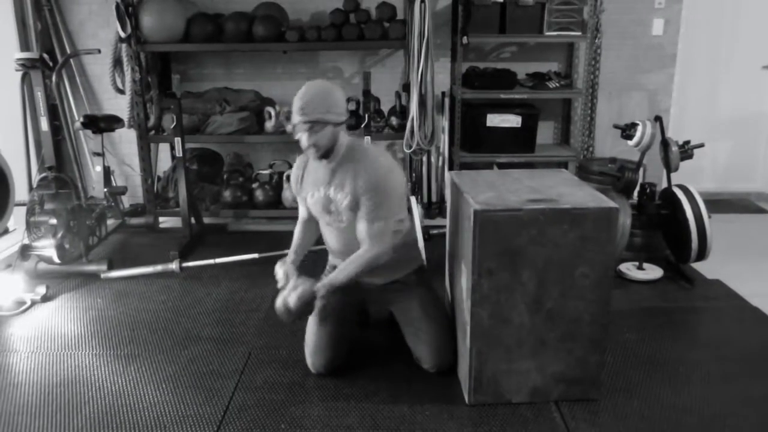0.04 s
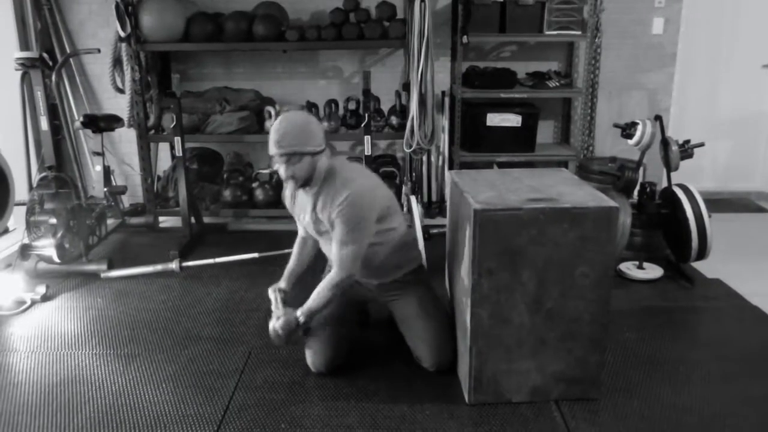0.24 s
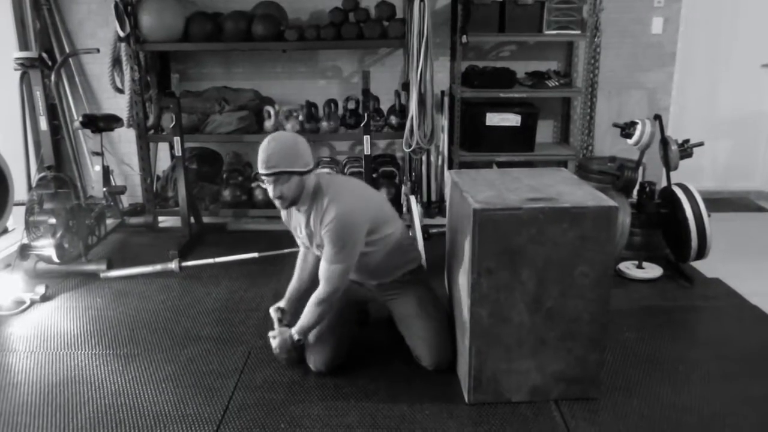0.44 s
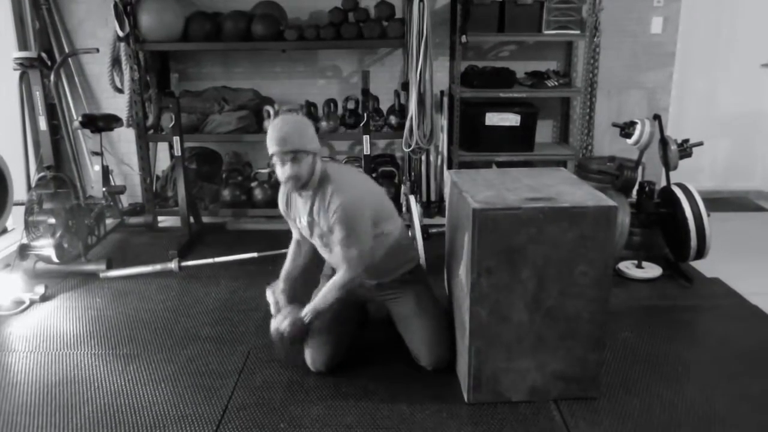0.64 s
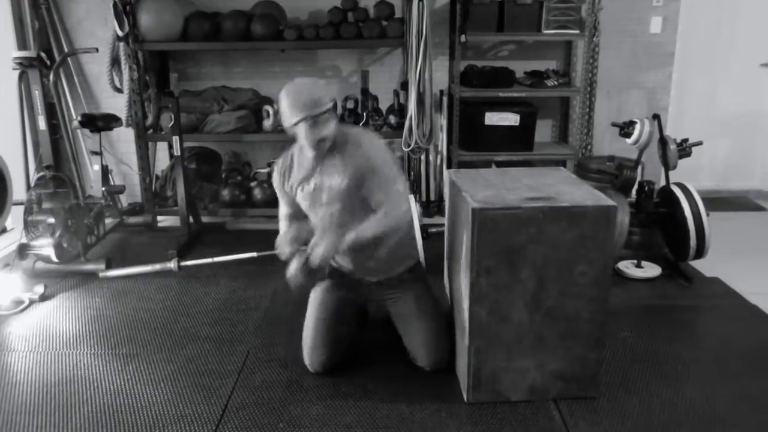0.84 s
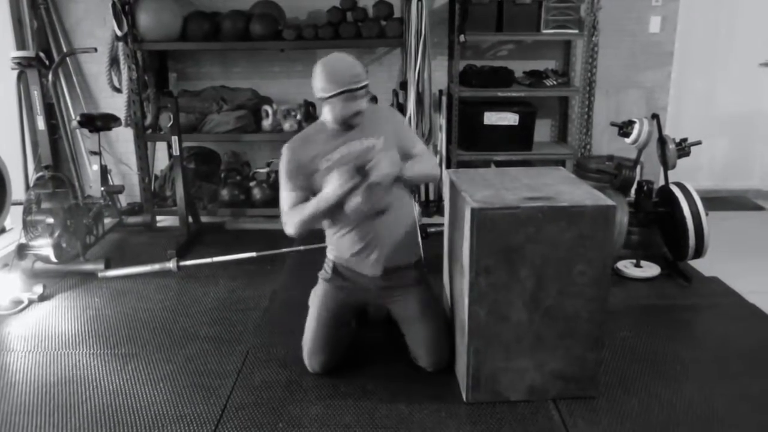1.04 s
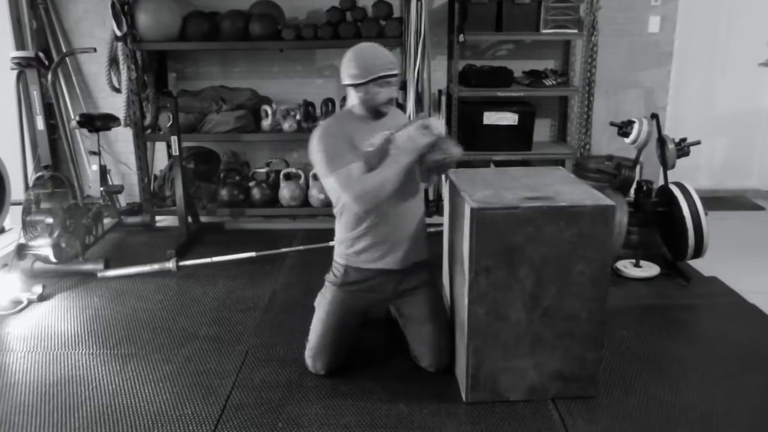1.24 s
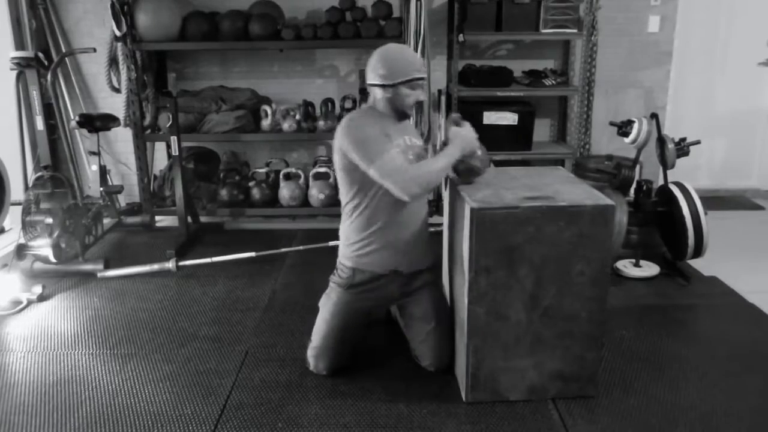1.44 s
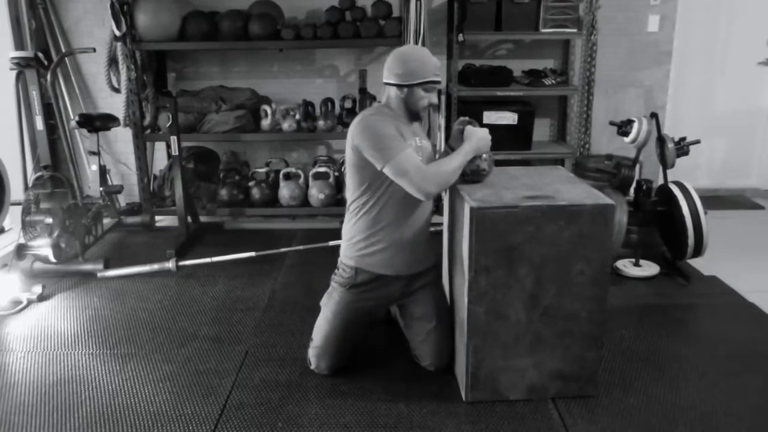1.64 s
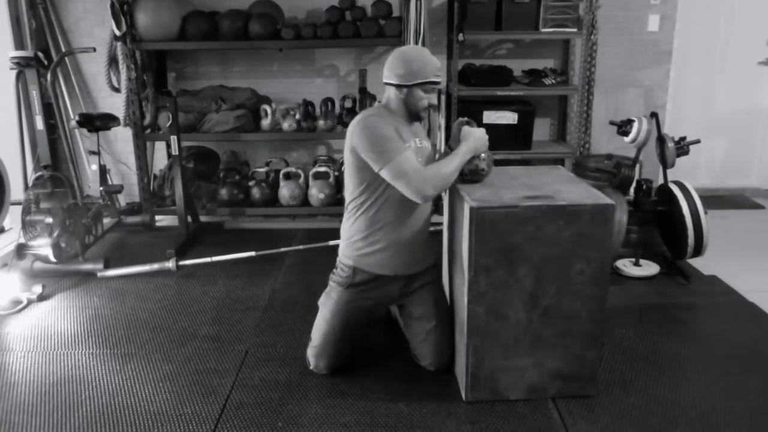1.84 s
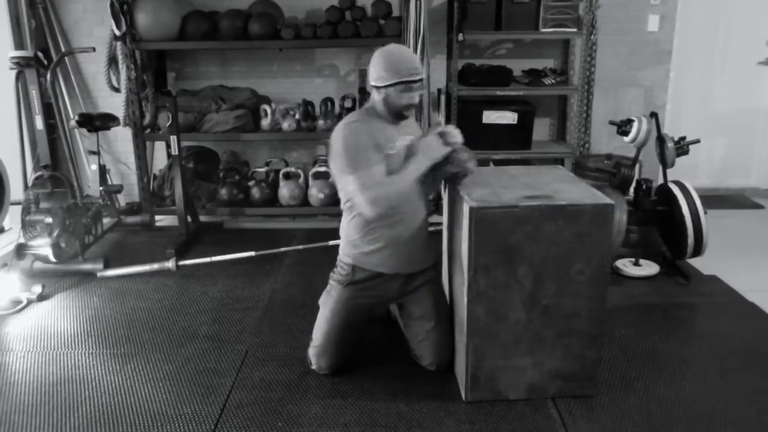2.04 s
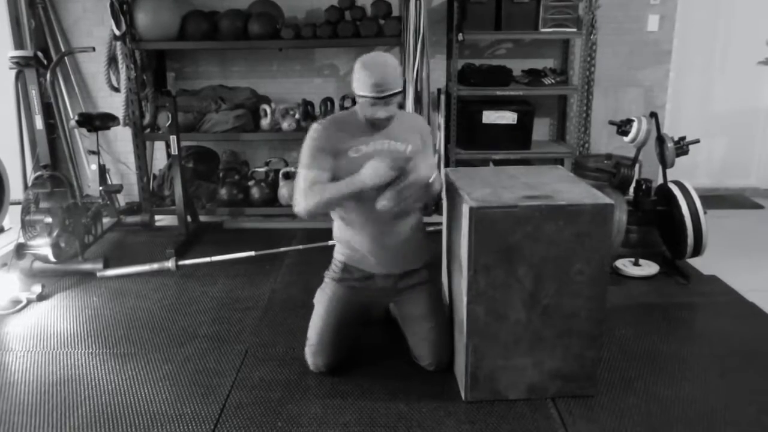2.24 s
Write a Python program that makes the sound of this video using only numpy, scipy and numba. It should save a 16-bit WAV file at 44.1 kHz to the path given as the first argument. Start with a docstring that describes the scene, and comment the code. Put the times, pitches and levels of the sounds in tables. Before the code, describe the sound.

Hollow plywood box booms as an iron weight lands, then the weight drags off its lid

```python
"""In a garage gym, a kneeling lifter handles an iron weight while sleeves and trousers brush.
The weight knocks on the rubber mat, is set on a hollow plywood box, which booms, and is dragged off again.
Knocks and booms are short pushes into ringing tones; cracks, cloth and air are shaped noise.
A room adds its echo, and a gain control turns everything down under the loud blows."""
import sys
import numpy as np
from scipy import signal
from scipy.fft import rfft, irfft
from scipy.io import wavfile
from scipy.ndimage import uniform_filter1d
from numba import njit

SR = 44100
rng = np.random.default_rng(int(sys.argv[2]) if len(sys.argv) > 2 else 0)


def master(y):
    """Save y as 16-bit WAV."""
    cut = np.clip(np.atleast_2d(y).T, -1, 1)
    pcm = np.round(cut * 32767)  # scale
    wavfile.write(sys.argv[1], SR, pcm.astype(np.int16))


N = 101297
T = np.arange(N) / SR  # time of every sample, in seconds

# A "ring time" or "decay time" is the time to fade by 60 dB.

# Air noise: (frequency [Hz], level per Hz [dB])
AIR_COLOUR = [(18, -55), (30, -38), (48, -8.5), (143, -6.5), (172, 3), (201, -7), (255, 0.5), (357, -3),
              (386, -3.5), (618, -5.5), (867, -5.5), (3640, -16), (7960, -28), (10100, -27.5), (15300, -39)]
# Air over time: (time [s], level [dB], treble tilt [dB per octave])
AIR_OVER_TIME = [(0, -39, 0.2), (.3, -37.5, -0.4), (.6, -39.5, 0.84), (.83, -40, -.2), (.875, -37, 0.1),
                 (.95, -38, -.5), (1.02, -37.5, 0.35), (1.12, -38, 0.2), (1.5, -38.5, -0.26),
                 (1.7, -36, -1.93), (2.0, -39.5, -0.56), (2.29, -36, -0.4)]
# Stereo width of the air: (frequency [Hz], side level against middle [dB])
AIR_WIDTH = [(60, 0.5), (110, -25), (200, -17.5), (380, -16.5), (690, -9.5), (1280, -4), (2360, -7.5),
             (4360, -6), (8040, -4), (14800, -2)]
AIR_LEFT_DB = 1.8  # lean to the left in the treble, less and less below 1000 Hz
AIR_SWELL_DB, AIR_FLICKER_DB = 0.5, 0.6

# Echo of the room: (frequency [Hz], decay time [s])
ROOM_DECAY = [(80, 0.84), (250, 0.61), (700, 0.61), (1500, 0.29), (4000, 0.25), (12000, 0.04)]
# Stereo width of the echo: (frequency [Hz], side level [dB])
ROOM_WIDTH = [(60, -33), (200, -99), (400, -48), (800, -13.5), (1500, -8.5), (12000, 0.5)]
ROOM_DELAY_S = 0.008
# how much of each source is sent to the echo
BOX_WET_DB, CRACK_WET_DB, MAT_WET_DB, CLOTH_WET_DB = -20, -3.5, -10.5, -4

# Cloth brushes, one list each: (time [s], level [dB], treble tilt [dB per octave])
CLOTH_BRUSHES = [
    [(.3, -68, -5.5), (.35, -59, 9), (.44, -46, 6), (.49, -41, -1), (.52, -47, 7.5), (.57, -57, 3)],
    [(.61, -55, 4), (.655, -41.5, 5), (.70, -37, 0.2), (.74, -33.5, 0.5), (.765, -39.5, 3), (.80, -47, 4.5),
     (.86, -51.5, -9)],
]
# Cloth noise: (frequency [Hz], level per Hz [dB])
CLOTH_NOISE = [(710, -35), (1200, -2), (1450, 2.5), (1810, 0), (2850, 1.5), (4000, 2), (4400, -2),
               (10000, -8), (15000, -16)]
CLOTH_FLICKER_DB = 0.8

# The touch on the mat and its echoes off the near walls: (time [s], level [dB])
MAT_TOUCHES = [(.5030, -6), (.5115, -11), (.5293, -13.5), (.5375, -12), (.55, -11.5)]
# Tones of mat and floor under the weight: (frequency [Hz], level [dB], ring time [s], push direction [+1 or -1])
MAT_TONES = [(74.5, -35, 0.22, -1), (376, -17.5, 0.13, -1), (626, -24, 0.05, 1), (696, -6, 0.053, 1),
             (770, -5, .025, 1), (880, -14, 0.018, -1)]
# Dense rattle of mat and floor: (frequency [Hz], level per Hz [dB])
MAT_RATTLE = [(50, -16), (80, -11), (170, -13.5), (280, -4), (420, -1), (750, -2), (1000, -8), (1250, -25),
              (3000, -47)]
# How that rattle fades: (frequency [Hz], decay time [s])
MAT_RATTLE_DECAY = [(80, .3), (300, .4), (550, 0.25), (750, .22), (1000, .2)]
TOUCH_PUSH_MS, MAT_RATTLE_DB = 0.99, -19

# Drag off the lid, levels over time: (time [s], thump level [dB], scrape level [dB])
DRAG_LEVELS = [(2.0845, -42, -63), (2.0865, -23.5, -30.5), (2.105, -19.5, -31), (2.125, -21.5, -31),
               (2.14, -17.5, -35), (2.165, -17.5, -37), (2.18, -28, -43), (2.21, -33, -46),
               (2.28, -44, -52)]
# Scraping noise: (frequency [Hz], level per Hz [dB])
SCRAPE_NOISE = [(350, -17), (600, -6.5), (668, 5), (754, -7), (1240, -14), (1330, -10.5), (3140, -14),
                (15000, -44)]
JERKS_PER_S, JERK_JITTER, JERK_SCATTER_DB, JERK_PUSH_MS = 108, 0.1473, 6, 2.85
LOADED_RING_FACTOR = 0.046  # the loaded lid rings for this share of its free ring time

# Iron meets the lid, edge first, then full weight:
# (time [s], push level [dB], push length [ms], crack level [dB], clack level [dB])
LID_BLOWS = [(1.5393, -5.5, 1.33, -14.5, -8), (1.5440, 8, 1.5, -15.5, -0.5)]
# Short clack of the iron: (frequency [Hz], level [dB], ring time [s], push direction [+1 or -1])
IRON_TONES = [(1250, -12, .03, 1), (1750, -12, .022, -1), (3400, -24, .02, 1), (4450, -27, .015, -1)]
# Countless small panel tones heard as a dull crack: (frequency [Hz], level per Hz [dB])
CRACK_NOISE = [(300, -1), (500, 4.5), (900, -3), (1600, -9.5), (2200, -15), (3500, -28.5), (6000, -32.5),
               (12000, -64)]
# How the crack fades: (frequency [Hz], decay time [s])
CRACK_DECAY = [(400, 0.33), (900, 0.28), (1600, 0.064), (3500, 0.05), (12000, 0.022)]
IRON_PUSH_MS = 0.22
RATTLE_RISE_S = 0.0011  # for both the crack and the mat rattle

# Big tones of the plywood box: (frequency [Hz], level [dB], ring time [s], push direction [+1 or -1])
# Close pairs pushed in opposite directions beat against each other.
BOX_TONES = [(119.7, -23, 0.4, 1), (135, -17.5, 0.83, -1), (161.83, -10.5, 0.67, 1),
             (168.6, -14.5, 0.82, -1), (189.6, -18.5, 0.63, 1), (248.4, -20.5, 0.57, -1),
             (251, -20, 1.2, -1), (262.7, -8.5, 0.95, 1), (269, -22, 1.5, -1), (273.4, -3.5, 0.082, -1),
             (289.6, -15.5, 1.1, -1), (314.8, -5, 0.31, 1), (349.6, -11, 0.39, 1), (378, -5, 0.24, -1),
             (383.6, -8.5, .2, 1), (402, -16, 0.74, -1), (438, -29, 0.5, -1), (489, -20.5, 0.21, 1),
             (602, -16.5, 0.16, 1), (733, -17.5, 0.5, 1), (790, -20, 0.045, 1)]
MUTED_FROM_S, MUTED_DB_PER_S = 1.835, 95  # from here the boom dies faster

LOW_CUT_HZ, TOP_HZ = 93, 15250
GAIN_TOP_DB, GAIN_RATIO, GAIN_ATTACK_S, GAIN_RELEASE_S = -28.5, 1.424, 0.016, 0.14
LEFT_RIGHT = np.array([[1], [-1]])  # side sound is added on the left, subtracted on the right


def undb(db):
    """Turn decibels into a plain multiplier."""
    return 10 ** (np.asarray(db) / 20)


def unit(x):
    """Scale a sound to an average (RMS) level of 1."""
    return x / np.sqrt(np.mean(x ** 2))


def at_hz(table, hz):
    """Read a (frequency, value) table between its rows, on a log-frequency axis."""
    rows = np.array(table, float)
    return np.interp(np.log(np.maximum(hz, 1)), np.log(rows[:, 0]), rows[:, 1])


def at_s(table, column=1):
    """Read one column of a time table for every sample."""
    rows = np.array(table, float)
    return np.interp(T, rows[:, 0], rows[:, column])


def walk(rate):
    """Wander at random: draw `rate` levels a second, hold each, then smooth twice."""
    hold = int(SR / rate)
    steps = np.repeat(rng.standard_normal(N // hold + 1), hold)
    smooth = uniform_filter1d(uniform_filter1d(steps, hold), hold)
    return 1.5 * smooth[:N]  # makes up for the swing lost in smoothing


def bands(colour, size):
    """Split noise of a given colour into half-octave bands: (centre Hz, middle noise, side noise)."""
    freqs = np.fft.rfftfreq(size, 1 / SR)
    spectra = rfft(rng.standard_normal((2, size))) * undb(at_hz(colour, freqs))
    for hz in 30 * 2 ** (np.arange(19) / 2):
        octaves_away = np.log2(freqs / hz + 1e-9)
        window = np.cos(np.pi * np.clip(octaves_away, -0.5, 0.5)) ** 2
        yield hz, irfft(spectra * window, size)


def ring(tones, ring_factor=1.0):
    """An object answers one tap with a sum of fading tones."""
    t, out = T[:SR], 0
    for hz, db, t60, direction in tones:
        fade = 1000.0 ** (-t / (t60 * ring_factor))
        out = out + np.sign(direction) * undb(db) * np.sin(2 * np.pi * hz * t) * fade
    return out


def push(start, db, ms):
    """A contact force swells and drops smoothly; a longer push of equal total excites less treble."""
    progress = np.clip((T - start) / (ms / 1000), 0, 1)
    return undb(db) * np.sin(np.pi * progress) ** 2 * 2000 / (ms * SR)  # total of 1 at 0 dB


def conv(a, b):
    """Let every sample of one sound set off a copy of the other."""
    return signal.fftconvolve(a, b, axes=-1)[..., :N]


def rattle(hits, colour, decay):
    """Hits (time, dB) set off many small tones, heard as noise whose bands fade at their own pace."""
    parts = list(bands(colour, N))
    scale = np.std(sum(pair[0] for _, pair in parts))
    out = 0
    for start, db in hits:
        t = np.maximum(T - start, 0)
        rise = undb(db) * (1 - np.exp(-t / RATTLE_RISE_S))
        for hz, pair in parts:
            fade = 1000.0 ** (-t / at_hz(decay, hz))
            out = out + rise * fade * pair[0] / scale
    return out


def air():
    """Broad air noise whose bands swell together and flicker one by one."""
    out, swell = 0, walk(2.754)
    tilt = at_s(AIR_OVER_TIME, column=2)
    for hz, (mid, side) in bands(AIR_COLOUR, N):
        lean = mid * (undb(AIR_LEFT_DB / 2) - 1) * min(hz / 1000, 1)
        side = undb(at_hz(AIR_WIDTH, hz)) * side + lean
        level_db = AIR_SWELL_DB * swell + AIR_FLICKER_DB * walk(12.2) + tilt * np.log2(hz / 1000)
        out = out + undb(level_db) * (mid + side * LEFT_RIGHT)
    return unit(out) * undb(at_s(AIR_OVER_TIME))


def room():
    """Stereo echo made of fading noise, shorter in the treble and nearly mono in the bass."""
    t, out = T[:SR], 0
    for hz, (mid, side) in bands([(30, 0), (16000, 0)], SR):  # evenly coloured noise
        fade = 1000.0 ** (-t / at_hz(ROOM_DECAY, hz))
        out = out + fade * (mid + undb(at_hz(ROOM_WIDTH, hz)) * side * LEFT_RIGHT)
    out = np.pad(out, ((0, 0), (int(ROOM_DELAY_S * SR), 0)))
    return out / np.sqrt(np.sum(out ** 2) / 2)  # equal energy whatever the noise


def cloth():
    """Fabric sliding on fabric makes a soft, flickering hiss."""
    parts = list(bands(CLOTH_NOISE, N))
    scale = np.std(sum(pair[0] for _, pair in parts))
    out = 0
    for brush in CLOTH_BRUSHES:
        on = (T > brush[0][0]) & (T < brush[-1][0])
        level, tilt = at_s(brush), at_s(brush, column=2)
        for hz, pair in parts:
            if hz > 1000:
                level_db = level + tilt * np.log2(hz / 5000) + CLOTH_FLICKER_DB * walk(40.2)
                out = out + on * undb(level_db) * pair[0] / scale
    return out


def touch():
    """The weight pushes on mat and floor, which knock; wall echoes and a dense rattle follow."""
    force = sum(push(start, db, TOUCH_PUSH_MS) for start, db in MAT_TOUCHES)
    knock = conv(force, ring(MAT_TONES))
    rattle_start = MAT_TOUCHES[1][0]  # begins with the first echo
    return knock + rattle([(rattle_start, MAT_RATTLE_DB)], MAT_RATTLE, MAT_RATTLE_DECAY)


def drag():
    """The iron sticks and slips: uneven jerks thump the loaded lid while it scrapes."""
    start, end = DRAG_LEVELS[0][0], DRAG_LEVELS[-1][0]
    on = (T > start) & (T < end)
    chance = rng.standard_normal((40, 2))  # one row a jerk: timing, strength
    gaps = np.exp(JERK_JITTER * chance[:, 0])
    times = start + (np.cumsum(gaps) - 1) / JERKS_PER_S
    force = sum(push(s, JERK_SCATTER_DB * c, JERK_PUSH_MS) for s, c in zip(times, chance[:, 1]))
    thumps = conv(force, ring(BOX_TONES, LOADED_RING_FACTOR))
    thumps = thumps / np.std(thumps[on])
    scrape = unit(sum(pair[0] * undb(2 * walk(60)) for _, pair in bands(SCRAPE_NOISE, N)))
    return on * (undb(at_s(DRAG_LEVELS)) * thumps + undb(at_s(DRAG_LEVELS, column=2)) * scrape)


def crack():
    """Each contact makes the iron clack and sets off the small tones of the panels."""
    force = sum(push(start, clack_db, IRON_PUSH_MS) for start, _, _, _, clack_db in LID_BLOWS)
    clack = conv(force, ring(IRON_TONES))
    hits = [(start, crack_db) for start, _, _, crack_db, _ in LID_BLOWS]
    return clack + rattle(hits, CRACK_NOISE, CRACK_DECAY)


def set_down():
    """Each contact pushes the lid and rings the big tones of the hollow box."""
    force = sum(push(start, db, ms) for start, db, ms, _, _ in LID_BLOWS)
    boom = conv(force, ring(BOX_TONES))
    return boom * undb(-MUTED_DB_PER_S * np.maximum(T - MUTED_FROM_S, 0))


def scene():
    """Add the sources, their shared room echo and the air."""
    box = set_down() + drag()
    snap, mat, rub = crack(), touch(), cloth()
    wet = undb(BOX_WET_DB) * box + undb(CRACK_WET_DB) * snap
    wet = wet + undb(MAT_WET_DB) * mat + undb(CLOTH_WET_DB) * rub
    return box + snap + mat + rub + conv(wet[None], room()) + air()


@njit
def follow(x, attack, release):
    """Track loudness with a level that rises fast and falls slowly."""
    level, out = x[0], np.empty(len(x))
    for i in range(len(x)):
        level += (x[i] - level) * (attack if x[i] > level else release)
        out[i] = level
    return out


def record(dry):
    """The microphone drops deep bass, gain control turns loud parts down, peaks are rounded, the top is cut."""
    low_cut = signal.butter(4, LOW_CUT_HZ, "high", fs=SR, output="sos")
    dry = signal.sosfilt(low_cut, dry)
    # both channels share one gain, so the stereo picture stays still
    level = follow(np.abs(dry).max(axis=0), 1 / (GAIN_ATTACK_S * SR), 1 / (GAIN_RELEASE_S * SR))
    gain = np.minimum(1, undb(GAIN_TOP_DB) / (level + 1e-9)) ** (1 - 1 / max(GAIN_RATIO, 1))
    loud = dry * gain
    rounded = loud / (1 + loud ** 6) ** (1 / 6)
    top_cut = signal.ellip(10, 0.2, 70, TOP_HZ, fs=SR, output="sos")
    return signal.sosfilt(top_cut, rounded)


dry = scene()
out = record(dry)
master(out)
```